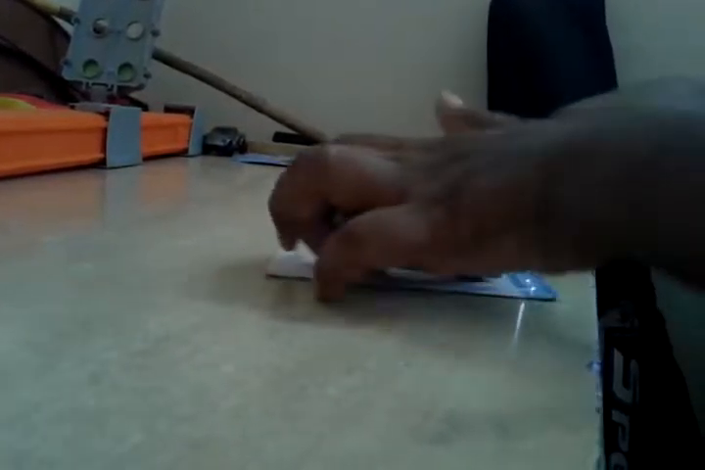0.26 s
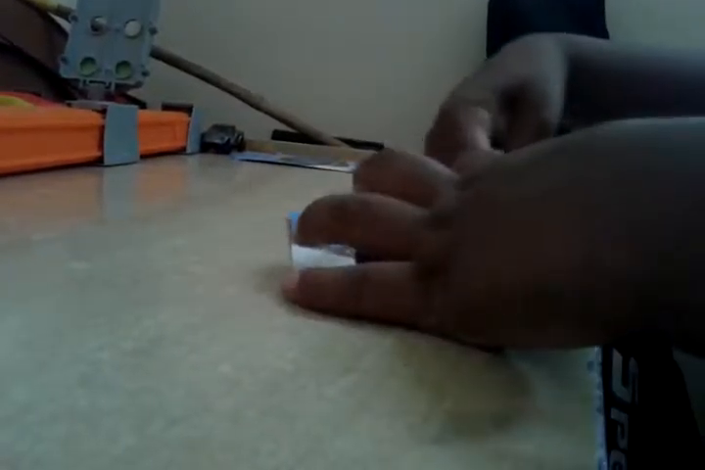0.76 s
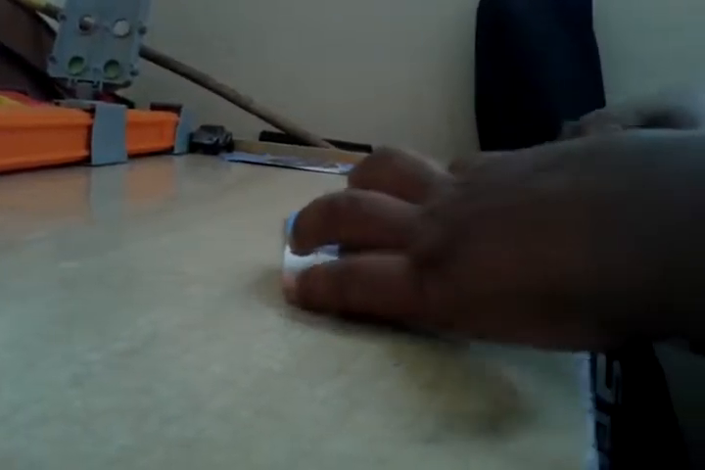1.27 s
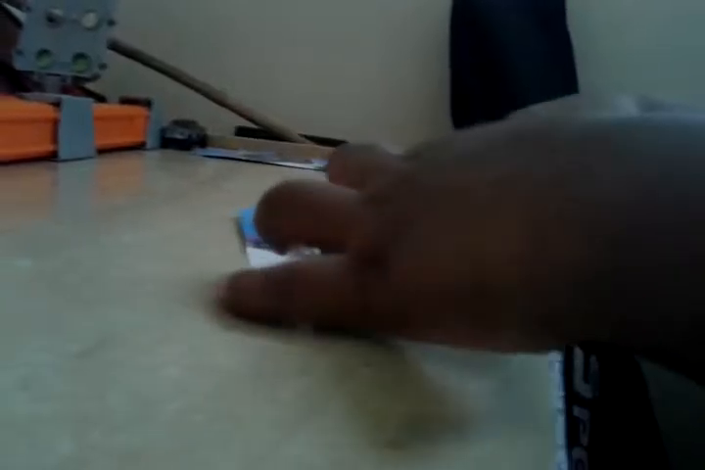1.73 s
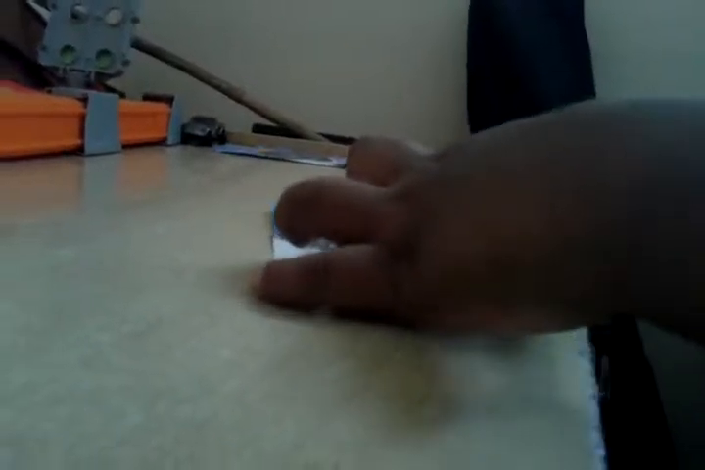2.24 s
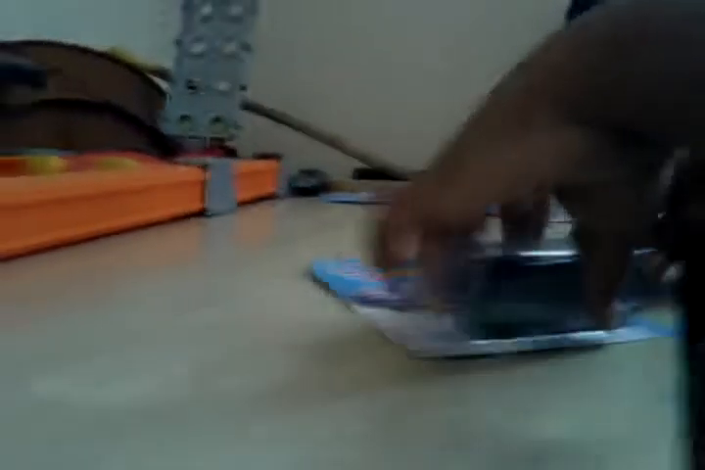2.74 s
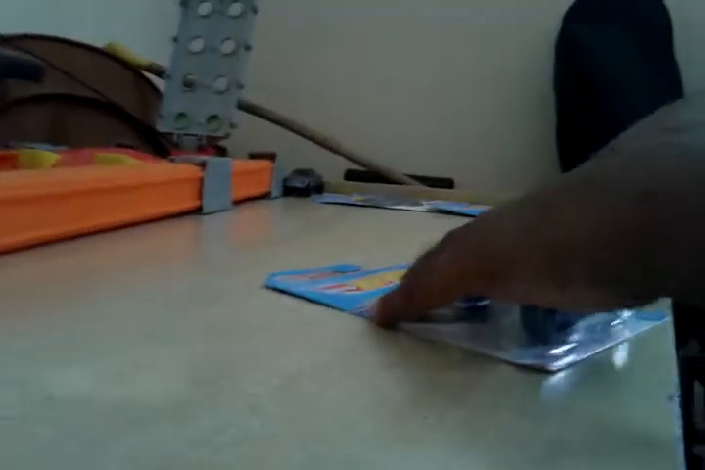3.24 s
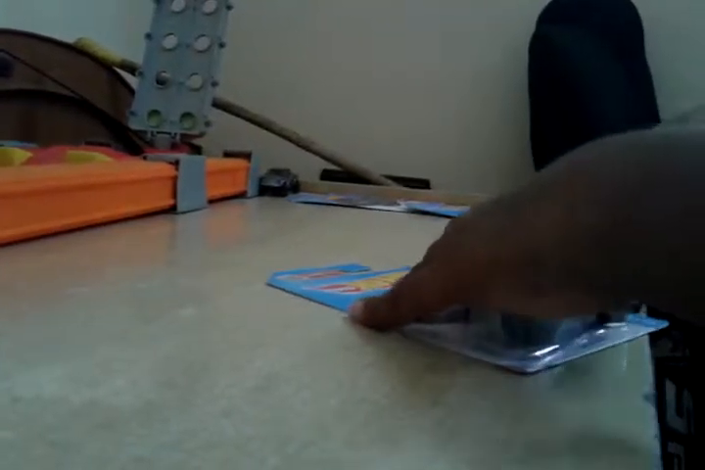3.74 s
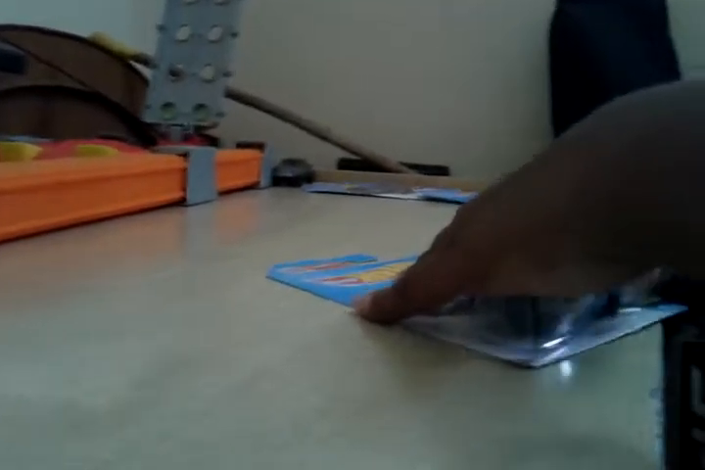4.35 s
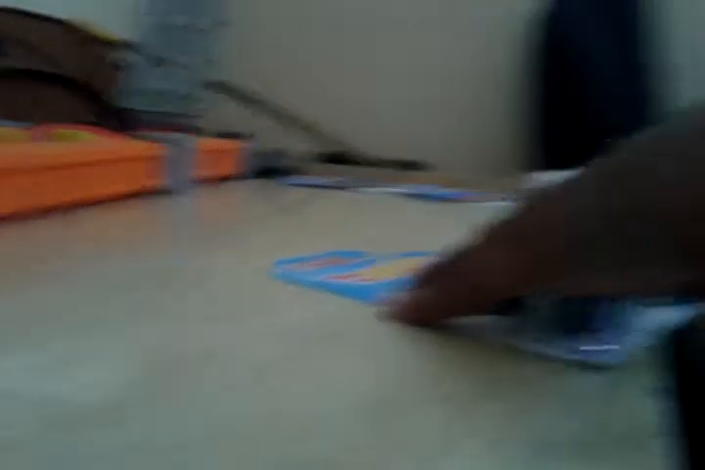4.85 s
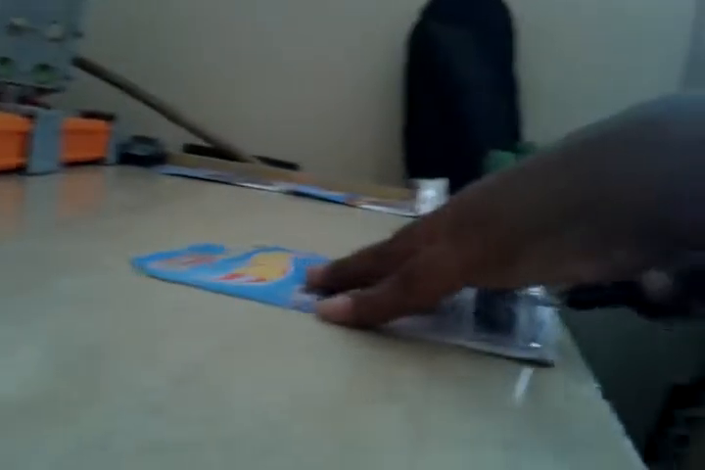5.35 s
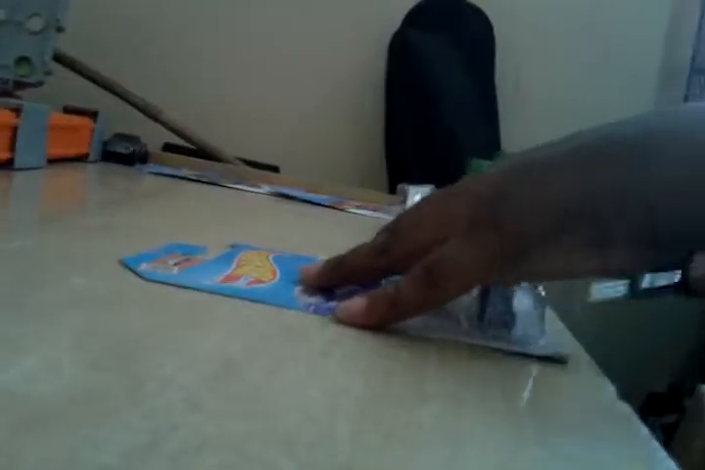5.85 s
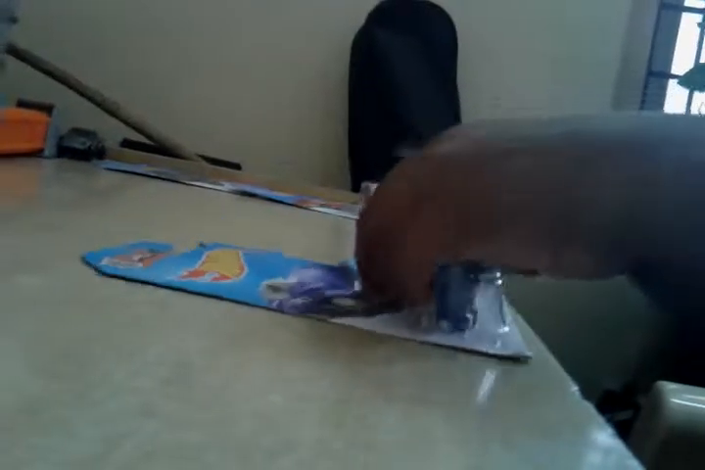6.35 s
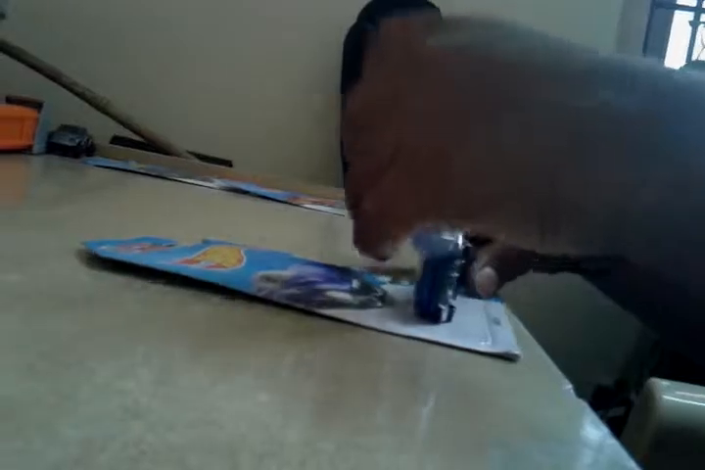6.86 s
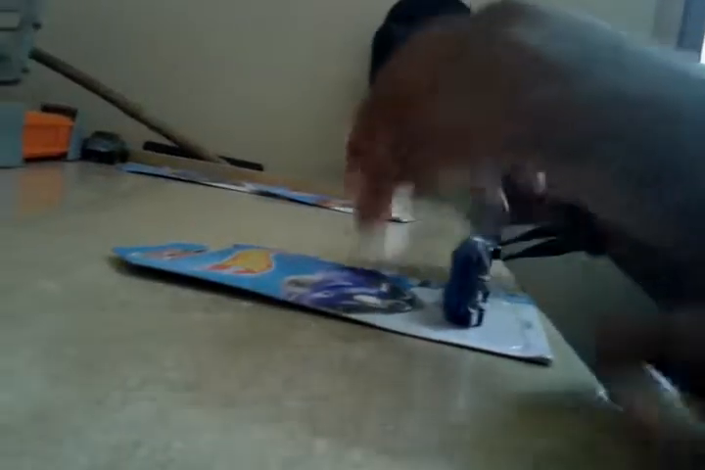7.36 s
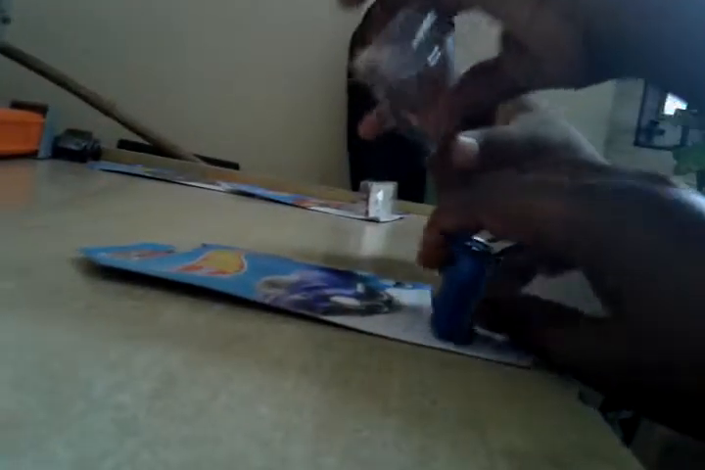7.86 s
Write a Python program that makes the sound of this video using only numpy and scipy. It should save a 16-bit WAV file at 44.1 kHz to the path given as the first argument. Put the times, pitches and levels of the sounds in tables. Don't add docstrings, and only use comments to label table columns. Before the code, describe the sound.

Close, irregular clicks and crinkles of stiff plastic packaging being peeled open, with card rubbing on a table over faint room air and hum.

```python
import sys
import numpy as np
from scipy import signal
from scipy.io import wavfile

SR = 44100
rng = np.random.default_rng(int(sys.argv[2]) if len(sys.argv) > 2 else 0)


def volts_from_db(level):
    exponent = np.asarray(level, float) / 20
    return 10 ** exponent


def store_wav(level_fs):
    pcm = np.round(np.clip(np.atleast_2d(level_fs), -1, 1) * 32767)
    wavfile.write(sys.argv[1], SR, pcm.T.astype(np.int16))


N = 357341


def rms_one(x):
    return x / np.sqrt(np.mean(x ** 2, axis=-1, keepdims=True) + 1e-20)


def in_time(rows):
    s, *columns = np.transpose(rows)
    return [np.interp(np.arange(N) / SR, s, c) for c in columns]


def at_hz(points, hz):
    point_hz, values = np.array(points)[:, :2].T
    return np.interp(np.log(hz), np.log(point_hz), values)


def band(x, low_hz, high_hz):
    sos = signal.butter(2, [low_hz, min(high_hz, .47 * SR)], "band", fs=SR, output="sos")
    return signal.sosfilt(sos, x)


def resonate(x, hz, width_hz):
    r = np.exp(-np.pi * width_hz / SR)
    zeros = np.array([1, 0, -1]) * (1 - r * r) / 2
    poles = [1, -2 * r * np.cos(2 * np.pi * hz / SR), r * r]
    return signal.lfilter(zeros, poles, x)


def drift(rate):
    r = np.exp(-80 * np.pi * rate / SR)
    slow = signal.lfilter([1], [1, -2 * r, r * r], rng.standard_normal(N // 40 + 2002))[2000:]
    return np.interp(np.arange(N) / 40, np.arange(len(slow)), rms_one(slow))


def third_octaves():
    edges = 25 * 2 ** np.arange(0, 9.7, 1 / 3)
    return zip(edges, np.sqrt(edges[:-1] * edges[1:]), edges[1:])


def lay_out(times, sounds):
    out = np.zeros(N + len(sounds[0]))
    for s, sound in zip(times, sounds):
        start = round(s * SR)
        out[start:start + len(sound)] += sound
    return out[:N]


def swells(rows, size=8192):
    t = np.arange(size) / SR
    length_s = np.maximum(np.array(rows)[:, 1:2], .01)
    return np.sin(np.pi * np.minimum(t / length_s, 1)) ** 0.7


def crack_colour(x):
    # pitch_hz, width_hz, level_db
    port_modes = [(7050, 1820, 4), (5390, 1070, -0.5), (3510, 1340, -3.5), (7730, 610, -9)]
    out = 0
    for k, (hz, width_hz, db) in enumerate(port_modes):
        out = out + volts_from_db(db) * (-1) ** k * resonate(x, hz, width_hz)
    return band(out, 3350, 9840)


def air():
    # frequency_hz, density_db
    air_spectrum = [(20, -24), (140, -14.5), (420, -7.5), (1100, -8.5), (3890, -25), (6300, -25),
                    (9580, -34), (17000, -35)]
    # start_s, level_db
    air_level = [(0.0, -49), (0.72, -55), (1.4, -47.5), (1.67, -53), (2.55, -48), (2.84, -50), (4.31, -54),
                 (4.51, -47.5), (4.94, -50), (6.54, -49.5), (6.72, -51.5), (8.1, -50)]
    # pitch_hz, width_hz,
    # level_db
    air_resonances = [(208, 22, 3), (263.7, 42, 7), (302.4, 33, 8), (493, 76, -1.5), (7100, 1500, 1.5)]
    # start_s, fundamental_db, second_harmonic_db
    hum_levels = [(0.0, -67, -77), (0.11, -61, -75), (0.36, -79, -78), (0.45, -64, -90), (0.54, -80, -76),
                  (1.87, -61, -75), (2.07, -76, -75), (2.35, -60, -68), (2.82, -71, -77), (3.29, -63, -62),
                  (3.99, -81, -83), (4.56, -72, -66), (4.98, -70, -81), (5.3, -71, -74), (8.05, -68, -78),
                  (8.1, -74, -90)]

    white, together, out = rng.standard_normal((2, N)), drift(16.7), 0
    swell_db = 0.69 * (in_time(air_level)[0] + 51.5)
    for k, (low, hz, high) in enumerate(third_octaves()):
        bass = 1 / (1 + (hz / 1800) ** 2)
        moving_db = bass * (swell_db + 2.23 * together) + 0.4 * drift(19.4)
        out = out + volts_from_db(at_hz(air_spectrum, hz) + moving_db) * band(white[k % 2], low, high)
    out = out + sum(volts_from_db(db) * resonate(out, hz, width_hz) for hz, width_hz, db in air_resonances)

    mains_hz = 59.1 + 2.37 * drift(2.76)
    phase = 2 * np.pi * np.cumsum(mains_hz) / SR
    hum_db, second_db = in_time(hum_levels)
    hum = volts_from_db(hum_db + 2.5 + 1.5 * drift(6.0)) * np.sin(phase)
    hum = hum + volts_from_db(second_db) * np.sin(2 * phase)
    return volts_from_db(-47.5) * rms_one(out) + hum


def room(x):
    # frequency_hz, t60_s
    decay_times = [(300, 0.48), (1000, 0.36), (2500, 0.33), (6000, 0.26), (14000, 0.23)]
    # frequency_hz, gain_db
    tail_gain = [(300, 13), (1500, 1.5), (4000, 1.5), (5400, -1.5), (7000, 1.5), (9500, -1.5),
                 (14000, -2.5)]
    # delay_s, level_db
    echoes = [
        (.007, -19),
        (0.031, -23),
    ]

    t = np.arange(SR // 2) / SR
    white, smear = rng.standard_normal((2, len(t))), rng.standard_normal(len(t))
    tail = 0
    for k, (low, hz, high) in enumerate(third_octaves()):
        if hz > 150:
            decay_db = at_hz(tail_gain, hz) - 60 * t / at_hz(decay_times, hz)
            tail = tail + volts_from_db(decay_db) * band(white[k % 2], low, high)
    tail = tail * (1 - np.exp(-(t / 0.0095) ** 2))
    answer = volts_from_db(-7.5) * tail / np.sqrt(np.sum(tail ** 2))
    for lag, db in echoes:
        puff = smear * np.exp(-np.abs(t - lag) / 0.0021) * (t > lag)
        answer = answer + volts_from_db(db) * puff / np.sqrt(np.sum(puff ** 2))
    return signal.fftconvolve(x, answer)[:N]


def bumps(width_hz=160):
    # start_s, length_s, pitch_hz, level_db
    leans = [(1.27, .04, 300, -46), (1.44, .03, 450, -44), (2.03, .06, 350, -48), (2.456, .02, 480, -43),
             (2.86, .04, 300, -48), (3.03, .04, 300, -45), (3.37, .04, 350, -46), (4.32, .05, 300, -44),
             (4.42, .04, 300, -45), (4.48, .04, 300, -50), (5.035, .04, 300, -45), (5.42, .04, 350, -47),
             (6.51, .04, 350, -49), (6.58, .04, 320, -49), (6.93, .04, 320, -44), (7.24, .04, 300, -47),
             (7.89, .04, 320, -46)]
    shape = swells(leans)
    noise = rng.standard_normal(shape.shape)
    sounds = []
    for (_, _, hz, db), env, x in zip(leans, shape, noise):
        murmur = resonate(resonate(x, hz, width_hz), hz, 2 * width_hz)
        sounds.append(volts_from_db(db) * env * rms_one(murmur))
    return lay_out([s for s, *_ in leans], sounds)


def knocks(t60=0.032, thud_hz=110):
    # start_s, peak_db, pitch_hz
    blows = [(1.379, -39.5, 515), (1.319, -41, 480), (1.396, -38, 450), (1.922, -43, 450),
             (2.288, -34, 280), (2.675, -44, 400), (2.479, -37, 345), (5.773, -32.5, 346)]
    t = np.arange(4096) / SR
    shape = volts_from_db(11.0 - 60 * t / t60) * (1 - np.exp(-t / 0.0016))
    thud = volts_from_db(-15.0) * np.sin(2 * np.pi * thud_hz * t)
    rings = [volts_from_db(db) * shape * (np.sin(2 * np.pi * hz * t) + thud) for _, db, hz in blows]
    return lay_out([s for s, *_ in blows], rings)


def slides(catches_per_s=700, uneven_db=4.0):
    # start_s, length_s, card_db, film_db
    strokes = [(.54, .05, -56, -56), (.79, .08, -56, -52), (1.0, .04, -52, -66), (1.81, .05, -53, -64),
               (1.875, .17, -56, -54), (2.765, .02, -56, -48), (2.955, .07, -60, -57),
               (3.17, .05, -54, -52), (3.71, .04, -54, -64), (3.785, .02, -52, -52), (3.9, .07, -51, -54),
               (4.235, .05, -60, -55), (4.55, .03, -50, -60), (5.13, .04, -50, -52), (5.85, .05, -51, -62),
               (6.03, .05, -56, -52), (7.33, .04, -53, -66), (7.53, .04, -60, -56), (7.69, .06, -57, -53),
               (7.79, .13, -54, -52), (7.94, .1, -52, -50), (.05, .09, -54, -52), (.195, .07, -44, -42),
               (2.6, .07, -48, -46), (4.47, .05, -50, -48), (6.44, .07, -52, -40), (6.75, .03, -60, -55),
               (7.15, .12, -56, -60), (1.2, .05, -58, -56), (1.39, .07, -52, -56)]
    s, _, card_db, film_db = np.transpose(strokes)
    shape = swells(strokes)
    catch_sizes = volts_from_db(uneven_db * np.minimum(rng.exponential(1, N), 2))
    catches = catch_sizes * (rng.random(N) < catches_per_s / SR)
    grit = rng.standard_normal(N) * (0.4 + signal.lfilter([1], [1, -.9], catches))
    card = rms_one(band(grit, 700, 3200))
    film = resonate(crack_colour(grit), 7000, 3500) + volts_from_db(-17.0) * band(grit, 8500, 15000)
    card_part = lay_out(s, volts_from_db(card_db)[:, None] * shape) * card
    return card_part + lay_out(s, volts_from_db(film_db)[:, None] * shape) * rms_one(film)


def rustle(per_s=1400, uneven_db=2.5):
    # start_s, level_db
    grip = [(0, -57), (.25, -49), (.56, -54.5), (.92, -65), (1.46, -52), (1.67, -53.5), (2.39, -49.5),
            (2.73, -47), (3.1, -58), (3.29, -47), (3.47, -59), (4.26, -57), (4.53, -49), (5.46, -49),
            (6.23, -55.5), (7.49, -57.5), (7.96, -42), (8.1, -44)]
    rub_db, = in_time(grip)
    crinkle_db = -54.5 + 1.5 * (rub_db + 53)
    sizes = volts_from_db(uneven_db * np.minimum(rng.exponential(1, N), 5)) * rng.choice([-1, 1], N)
    struck = rng.random(N) < per_s * volts_from_db(4.0 * drift(25)) / SR
    grains = sizes * struck + 0.23 * rng.standard_normal(N)
    crinkle = crack_colour(grains) + volts_from_db(-29.0) * band(grains, 6700, 8200)
    rub = band(grains, 970, 3540)
    return volts_from_db(crinkle_db - 10.5) * rms_one(crinkle) + volts_from_db(rub_db - 8.5) * rms_one(rub)


def snap_rows():
    # start_s, shell_hz, shell_db, crack_db, top_rel_db
    breaks = [(.0761, 1760, -40.5, -33, -13), (0.1674, 1890, -31, -20.5, 1), (.185, 1800, -19.5, -21, -20),
              (.191, 1800, -38, -24, -22), (0.8298, 1700, -43, -34, -19), (2.0141, 1000, -44.5, -36, -6),
              (2.5933, 2180, -30, -20.5, -16), (3.8057, 2640, -40, -33, -18), (3.9342, 1950, -43, -41, -14),
              (4.337, 2110, -25.5, -24.5, -16), (4.54, 2620, -47, -36.5, -18),
              (4.641, 2700, -38.5, -29, -40), (4.6496, 1600, -44, -35.5, -14),
              (5.2758, 2430, -39, -33, -14), (5.362, 1320, -35, -29.5, -14),
              (6.4069, 2480, -33, -22.5, -16), (6.431, 2280, -31, -25, -12), (8.031, 1200, -52, -35, -29),
              (3.257, 2500, -52, -39, -26), (3.392, 2680, -49, -45, -24), (5.214, 1500, -54, -48, -20),
              (5.258, 2560, -41, -36, -18)]
    # start_s, shell_hz, shell_db, crack_db, top_rel_db
    snips = [(2.785, 1500, -42, -29.5, -24), (3.8514, 1520, -43.5, -30, -11), (4.335, 2000, -33, -29, -21),
             (4.382, 1360, -34, -32, -24), (4.39, 1440, -37, -27, -6), (4.802, 2020, -36.5, -26, -3.5),
             (0.3233, 1210, -34.5, -29, -7), (5.1266, 2600, -38, -26, -22), (6.43, 2400, -31, -18, -13),
             (1.3777, 1410, -32, -31, -22), (2.2886, 1210, -31, -25, -8), (1.6946, 1000, -52, -46, -20)]
    # start_s, shell_hz, shell_db, crack_db, slip_ms
    tears = [(0.8742, 1750, -34, -23.5, 2.1), (1.319, 2200, -30.5, -36, 2.3),
             (1.3777, 1390, -26.5, -33.5, 2.8), (1.3949, 1440, -32.5, -36, 3.4), (1.978, 890, -46, -41, 32),
             (2.2726, 2660, -37, -36, 7), (2.2783, 1390, -28.5, -31, 4.5), (2.2878, 1210, -28, -33, 4.3),
             (2.8342, 1710, -38, -35.5, 9.5), (3.181, 1500, -48, -37, 6.9), (3.2611, 2510, -38, -29.5, 3.4),
             (3.33, 2390, -30, -25.5, 3.3), (3.3748, 1600, -34, -29, 4), (4.345, 1870, -35, -40, 5.9),
             (4.4491, 2500, -41, -37, 8.5), (4.4883, 1600, -36.5, -36.5, 18), (4.785, 1030, -44, -36, 10.5),
             (4.794, 1710, -37.5, -29, 28), (5.221, 1390, -31.5, -27.5, 2.4),
             (5.621, 1490, -26.5, -24, 3.3), (6.433, 2400, -29, -20.5, 4.3), (6.4619, 2200, -36, -25, 6),
             (7.929, 1730, -31.5, -31, 3.4), (8.044, 2190, -45, -32, 2.6)]
    # start_s, shell_hz, shell_db, crack_db
    clicks = [(.1012, 2110, -38, -36.5), (.115, 1820, -42, -41), (0.4641, 1410, -38, -42.5),
              (.8123, 1780, -48, -46), (1.2122, 1340, -43.5, -44.5), (1.6877, 1410, -44.5, -41),
              (2.007, 1410, -40, -46), (2.5533, 1160, -47, -41.5), (2.6802, 1360, -48, -43),
              (2.6854, 1520, -39.5, -38.5), (2.887, 1430, -46.5, -41), (3.171, 930, -45, -47),
              (3.323, 2630, -40, -33), (3.44, 2050, -48, -42), (3.897, 2100, -44, -42.5),
              (4.6118, 2260, -37, -34), (4.8527, 2700, -40, -36.5), (4.9229, 1300, -44, -39.5),
              (5.049, 2740, -38, -37), (5.1635, 2440, -44, -41), (5.183, 2550, -42, -39),
              (5.334, 1350, -45, -39.5), (5.443, 2260, -38, -37), (5.4742, 1480, -48, -51),
              (5.935, 2470, -47.5, -46.5), (6.0322, 1320, -47, -44.5), (6.7663, 1350, -45.5, -39),
              (6.9135, 2880, -44.5, -43), (7.497, 1570, -52, -49), (8.0482, 2660, -43, -35)]
    # start_s, shell_hz, shell_db, slip_ms
    flexes = [(.0636, 1010, -37.5, 3.8), (0.1696, 1690, -23.5, 2.4), (.8644, 676, -41, 2.5),
              (.877, 1300, -41, 13), (1.322, 1280, -32, 2.1), (1.3832, 1500, -34, 18),
              (1.9174, 1040, -35.5, 8.5), (2.4613, 695, -43, 14), (2.5804, 1240, -47, 3.3),
              (2.5959, 1400, -31, 1.9), (2.8157, 890, -44, 1.9), (3.178, 1360, -36, 15),
              (3.8109, 706, -43.5, 10), (4.456, 1440, -32, 4.8), (4.715, 1050, -38.5, 3),
              (5.6233, 2100, -26.5, 5.9), (5.771, 1000, -40, 3), (5.922, 1050, -43, 16),
              (6.0376, 1500, -43.5, 6.3), (6.9166, 2040, -45.5, 7.6), (7.0135, 840, -46, 14)]
    # start_s, crack_db, slip_ms
    ticks = [(.397, -48, 7.6), (.458, -48, 6.3), (1.352, -37, 2.8), (1.369, -40, 3.8), (1.9433, -40, 8.4),
             (2.1244, -46, 7), (2.2684, -43, 5.8), (2.4771, -44.5, 4.8), (2.8098, -44, 7),
             (3.1237, -45, 12), (3.428, -38, 2.5), (3.854, -39, 9.2), (3.9517, -43, 13),
             (4.239, -48.5, 2.7), (4.3078, -45.5, 5.1), (4.481, -46, 3.8), (4.691, -43, 2.2),
             (4.7648, -43, 5.4), (4.978, -47, 9), (4.9916, -41, 3.2), (5.3227, -39, 1.8), (6.9044, -44, 10),
             (7.5726, -39.5, 4.7), (7.692, -51, 14), (7.711, -47, 14), (7.809, -44, 2.5), (7.847, -49, 4.1),
             (7.8863, -45, 8.9), (7.935, -39, 5.2), (8.0174, -41, 8.3)]

    rows = [(*row, 1.74) for row in breaks]
    rows += [(*row, 0.78) for row in snips]
    rows += [(*row, -15.5, ms) for *row, ms in tears]
    rows += [(*row, -12, 3.8) for row in clicks]
    rows += [(s, hz, db, db - 10, -9, ms) for s, hz, db, ms in flexes]
    rows += [(s, 1300 * rng.uniform(0.46, 1.8), db - 7.5, db, -10, ms) for s, db, ms in ticks]
    return np.array(rows)


def settling():
    rows, t = snap_rows(), np.arange(8192) / SR
    strength = volts_from_db(np.maximum(rows[:, 2], rows[:, 3]))[:, None]
    after = lay_out(rows[:, 0] + 0.0019, strength * volts_from_db(-23) * np.exp(-t / 0.047))
    before = lay_out(rows[:, 0] - .04, strength * np.exp((t[:1764] - .04) / 0.0064))
    hits = rng.random(N) * (rng.random(N) < 900 / SR)
    bursts = signal.lfilter([1], [1, -.96], hits)
    ticks = rng.standard_normal(N) * (after * rms_one(bursts) + volts_from_db(-29) * before)
    return volts_from_db(10.0) * crack_colour(ticks) + band(ticks, 860, 3400) + volts_from_db(-8.0) * band(ticks, 6400, 11000)


def slip_runs(lengths_ms, size):
    t = np.arange(size) / SR * 1000
    ms = np.maximum(lengths_ms, .3)[:, None]
    z = rng.standard_normal((len(ms), size))
    run = z * np.abs(z) * np.exp(-t * 0.77 / ms) * np.minimum(t / (0.083 * ms), 1)
    return run * (1 + 1.3 / ms * np.exp(-t / 1.35))


def dents(size=1024):
    # start_s, pitch_hz, width_hz, level_db, slip_ms
    slaps = [(.186, 960, 500, -31.5, 2.4), (1.319, 6350, 900, -39, 2.5), (2.288, 3430, 800, -27, 1.2),
             (2.2885, 725, 310, -27.5, 0.97), (3.897, 3850, 250, -54, 9), (3.934, 3900, 400, -50, 1.6),
             (3.951, 3900, 250, -52, 3.5), (4.338, 1480, 510, -28, 1.8), (4.716, 1010, 200, -43, 1.5),
             (5.183, 2520, 200, -42, 1.8), (5.622, 5150, 810, -35.5, 2.2), (5.623, 940, 300, -38, 3),
             (5.623, 1440, 90, -30, 5.5), (2.289, 1300, 110, -30, 1.8), (6.766, 4970, 348, -45.5, 1.3),
             (7.929, 3600, 900, -41, 2.7), (2.2885, 1080, 350, -27, 1.1), (6.431, 5600, 900, -25, 4.5),
             (6.408, 5600, 500, -34, 2.2), (.1855, 6900, 700, -23, 3), (.168, 7600, 900, -26, 1.5),
             (5.622, 7900, 1100, -29, 2.2), (6.432, 11000, 900, -38, 3), (6.432, 2330, 330, -24.5, 4),
             (7.691, 4500, 400, -57, 1.5), (4.389, 9200, 1200, -36, .8), (2.7855, 7200, 1500, -32, 1.1),
             (4.3375, 6500, 1500, -28, 1.6), (7.574, 8500, 1200, -46, 1.5), (.3235, 9000, 1500, -38, .8),
             (.241, 7200, 1300, -41, 6), (6.824, 6500, 2500, -58, 1.5), (7.909, 8000, 1000, -54, 1.5),
             (3.3755, 5000, 900, -36, 2)]
    rows = np.array(slaps)
    rings = []
    for (_, hz, width_hz, db, _), slips in zip(rows, slip_runs(rows[:, 4], size)):
        ring = resonate(resonate(slips, hz, width_hz), hz, 2 * width_hz)
        rings.append(volts_from_db(db) * rms_one(ring))
    return lay_out(rows[:, 0], rings)


def snap_colour(slips, rows, shell_width_hz):
    hz, shell_db, crack_db, top_db = np.transpose(rows)[1:5, :, None]
    shell = np.array([resonate(resonate(x, f, shell_width_hz), f, 1.42 * f)
                      for x, f in zip(slips, hz[:, 0])])
    shell = rms_one(shell) + volts_from_db(-5.5) * rms_one(band(slips, 790, 3750))
    top = band(slips, 8800, 11400) - volts_from_db(-9.0) * band(slips, 12300, 16200)
    parts = (shell_db, shell), (crack_db, crack_colour(slips)), (crack_db + top_db - 3.0, top)
    return sum(volts_from_db(db - 4.0) * rms_one(part) for db, part in parts)


def snaps(size=1024):
    rows = snap_rows()
    clicks = np.tile(signal.unit_impulse(size), (len(rows), 1))
    near = snap_colour(slip_runs(rows[:, 5], size), rows, shell_width_hz=440)
    far = snap_colour(clicks, rows, shell_width_hz=580)
    return lay_out(rows[:, 0], near), lay_out(rows[:, 0], far)


def scene():
    hush = air()
    rub = rustle() + settling() + slides()
    ring = dents()
    near, far = snaps()
    direct = near + ring + rub + knocks() + bumps()
    reverberant = room(far + rub + volts_from_db(-9.5) * ring)
    return (direct + reverberant + hush)[None]


def low_pass(x):
    return signal.sosfilt(signal.butter(12, 19270, fs=SR, output="sos"), x)


def record(dry):
    held = np.clip(dry, -.97, .97)
    low_cut = signal.butter(2, 30, "high", fs=SR, output="sos")
    high_cut = signal.cheby2(8, 32, 17550, fs=SR, output="sos")
    return low_pass(signal.sosfilt(high_cut, signal.sosfilt(low_cut, held)))


dry = scene()
out = record(dry)
store_wav(out)
```